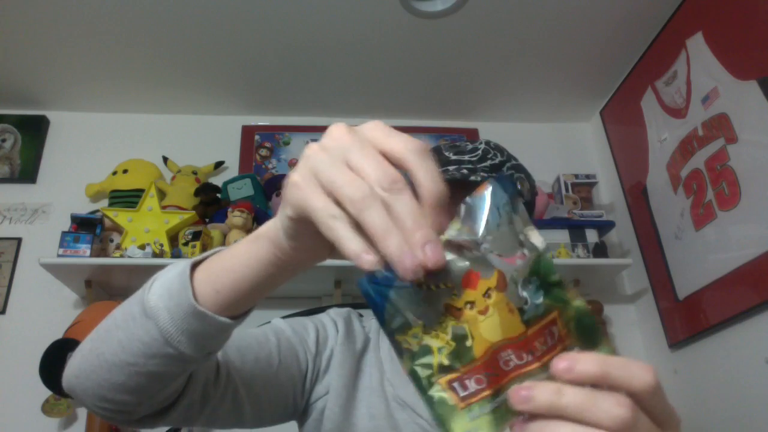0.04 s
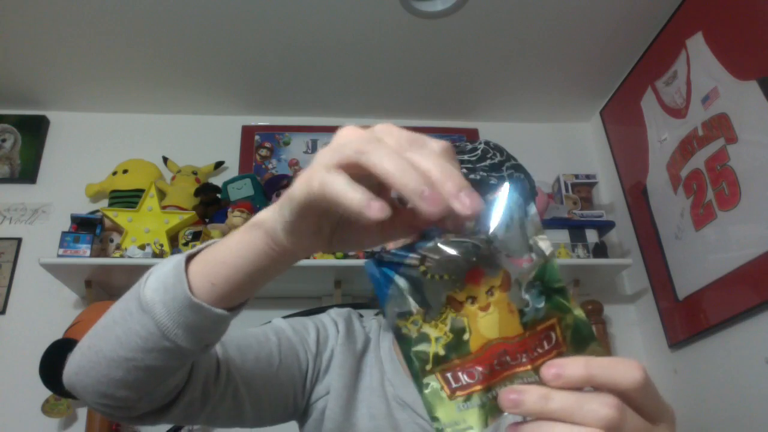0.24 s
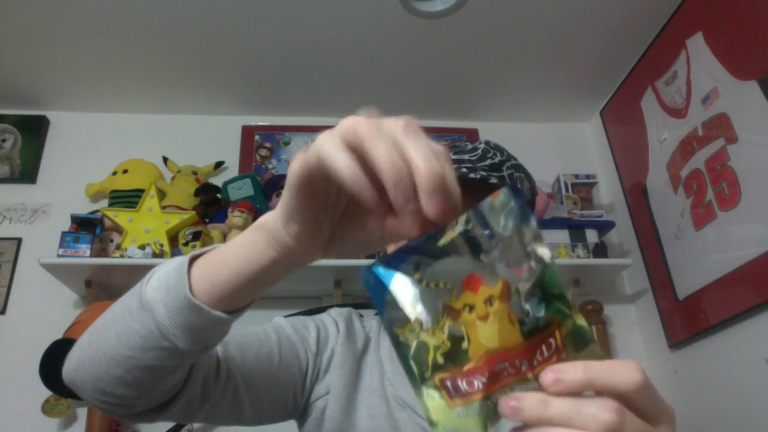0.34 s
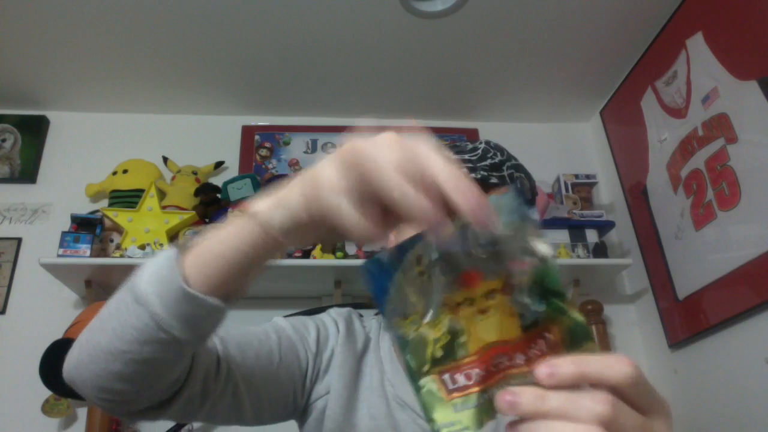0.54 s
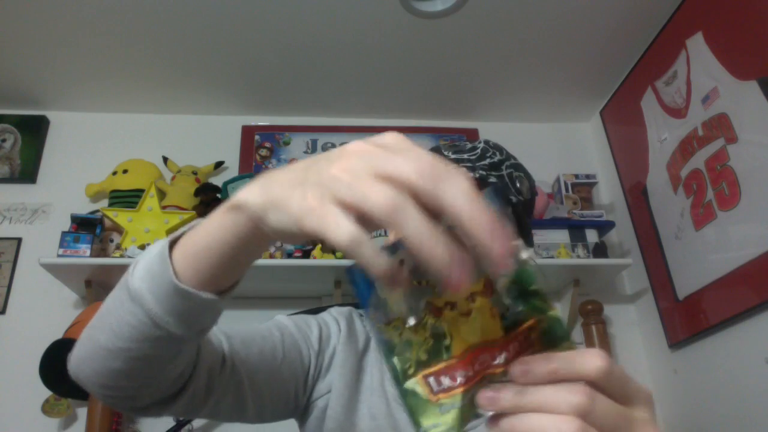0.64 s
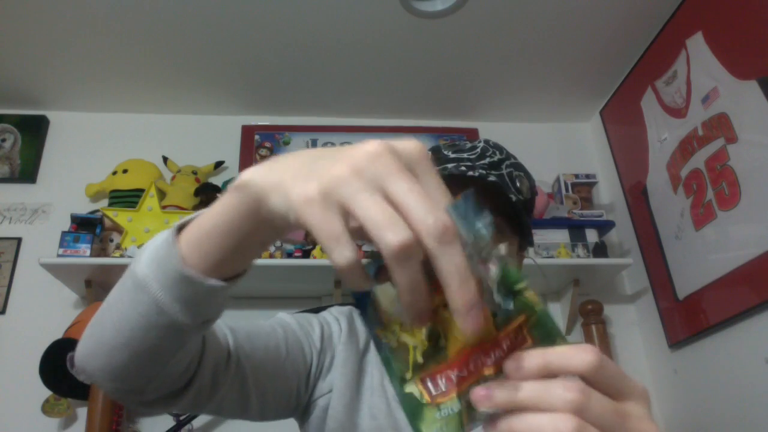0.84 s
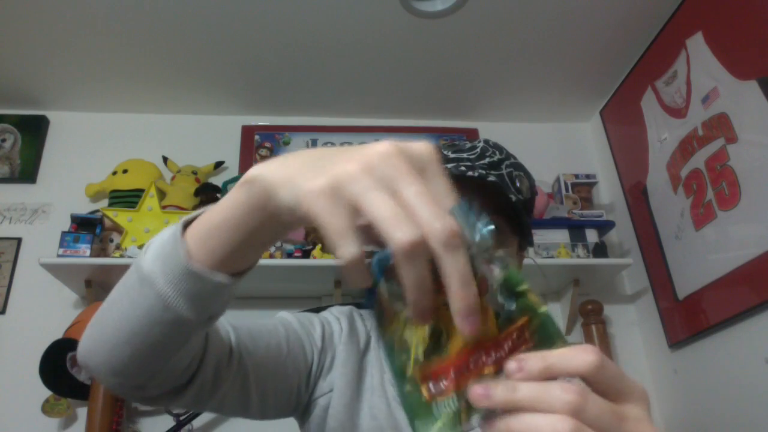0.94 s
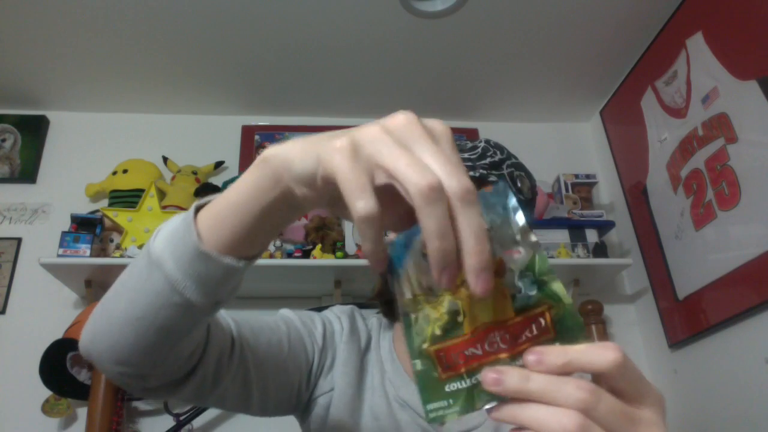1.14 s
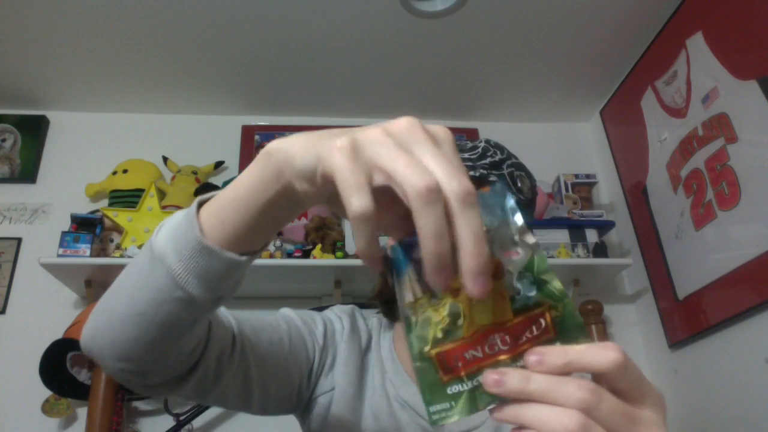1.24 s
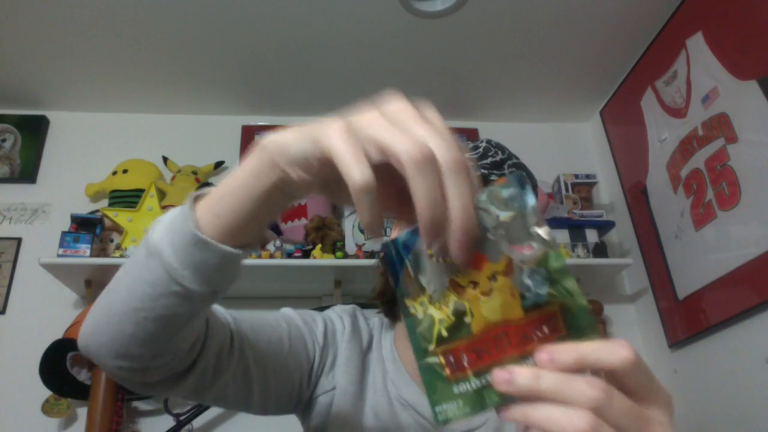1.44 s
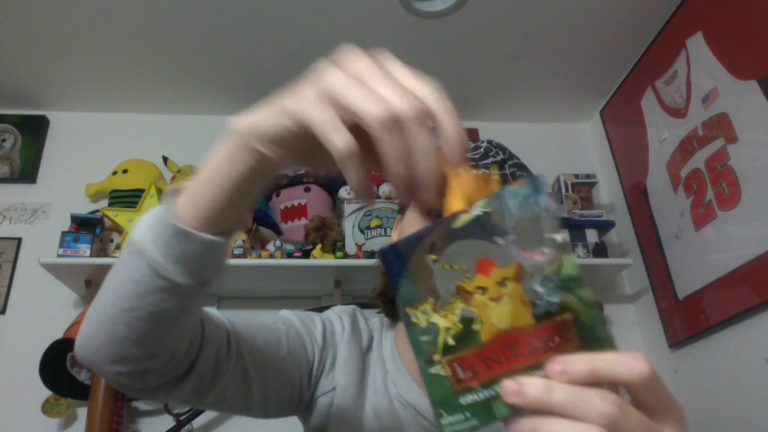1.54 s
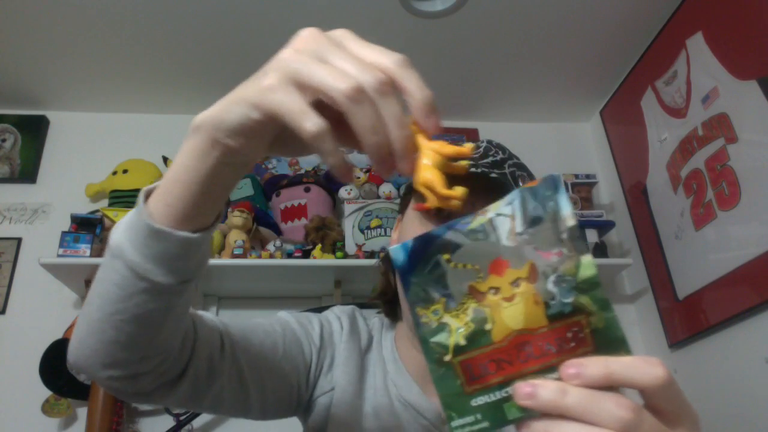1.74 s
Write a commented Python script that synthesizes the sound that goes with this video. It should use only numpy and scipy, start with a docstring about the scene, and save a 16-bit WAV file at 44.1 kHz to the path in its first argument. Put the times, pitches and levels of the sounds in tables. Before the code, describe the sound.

A foil packet crinkles up close as a hand rummages inside. Light ticks lead to a sharp snap at 0.2 seconds. Dense crackling and finger hiss follow from about 0.4 to 1 second, loudest around 0.6. Sparser snaps continue, with a soft bump at 1.1. The hand swishes out faintly near 1.4, and a last cluster of crackles around 1.5 dies away into a small, quiet room.

```python
"""Sharp snaps and fine crinkling of foil, close up: a hand rummages in a torn-open packet for a small toy.
Creases buckle, each ringing a patch of foil for a millisecond or two; a few leave taut foil buzzing, and the
pouch rings briefly as the toy pops free. Between snaps tiny creases tick, sliding fingers hiss and bump the
pouch, and the hand swishes out. A small, quiet room answers."""
import sys
import numpy as np
from scipy import signal
from scipy.fft import rfft, irfft
from scipy.io import wavfile
from scipy.ndimage import uniform_filter1d

SR = 44100
rng = np.random.default_rng(int(sys.argv[2]) if len(sys.argv) > 2 else 0)


def int16_out(signal):
    """Quantize to a 16-bit WAV file."""
    q = np.round(np.clip(np.atleast_2d(signal).T, -1, 1) * 32767)
    wavfile.write(sys.argv[1], SR, q.astype(np.int16))


N = 79380
SIZE = 4096  # samples per short event
BIN_HZ = np.fft.rfftfreq(SIZE, 1 / SR)


def amp(db):
    """Decibels to gain."""
    return 10 ** (np.asarray(db) / 20)


def unit(x):
    """Scale to rms 1."""
    return x / np.sqrt(np.mean(abs(x) ** 2) + 1e-20)


def read(points, hz):
    """Interpolate a table over log frequency."""
    point_hz, value = np.transpose(points)
    return np.interp(np.log(hz + 1), np.log(point_hz), value)


def add(mix, start_s, sound):
    """Mix a sound in at start_s."""
    part = mix[max(round(start_s * SR), 0):][:len(sound)]
    part += sound[:len(part)]


def coloured(x, spectrum):
    """Filter N samples by a spectrum table; rms 1."""
    return unit(irfft(rfft(x) * amp(read(spectrum, np.fft.rfftfreq(N, 1 / SR))), N))


def minimum_phase(gain):
    """Spectrum with this gain and the most abrupt onset."""
    cepstrum = irfft(np.log(np.maximum(gain, 1e-6 * gain.max())))
    cepstrum[1:SIZE // 2] *= 2
    cepstrum[SIZE // 2 + 1:] = 0
    return np.exp(rfft(cepstrum))


def foil_patch(hz, q, slope=1.69):
    """Gain curve of a foil patch's broad resonance."""
    ratio = (BIN_HZ + 1) / hz
    return unit((1 + (q * (ratio - 1 / ratio)) ** 2) ** (-slope / 2))


def grains(per_s, spread_db=3.5):
    """Random tiny clicks of uneven size."""
    size = amp(spread_db * np.minimum(rng.exponential(1, N), 4)) * rng.choice([-1, 1], N)
    return size * (rng.random(N) < per_s / SR)


def handling(ticks_per_s=2200, hiss_grains_per_s=2300):
    """Tiny creases crinkle, skin hisses over foil, the pouch rustles low."""
    # envelopes: (time [s], crinkle [dB], hiss [dB], rustle [dB])
    envelopes = [(0, -47.5, -66, -61), (0.121, -53.5, -65, -65), (.16, -70, -84, -80),
                 (0.212, -46, -54, -62), (.31, -60, -70, -60), (.365, -50, -64, -61),
                 (0.389, -40, -44, -52), (.425, -41, -52, -56), (.46, -27.5, -53, -41),
                 (.49, -47.5, -52, -63), (.56, -44, -57, -52), (.59, -29, -38, -58), (.63, -41, -43, -54),
                 (0.659, -23, -29, -43.5), (0.721, -40, -51, -48), (.745, -32, -38, -48),
                 (.79, -35, -42.5, -58), (0.822, -29.5, -46, -72), (0.891, -44.5, -55, -56),
                 (.94, -46.5, -58, -56), (1.0, -40, -57, -55), (1.089, -51, -52, -57),
                 (1.118, -32.5, -58, -48), (1.16, -46.5, -50.5, -72), (1.21, -51.5, -84, -74.5),
                 (1.259, -55.5, -66, -62), (1.325, -44.5, -53.5, -55), (1.358, -44.5, -47.5, -56),
                 (1.421, -43.5, -55, -55), (1.445, -27, -48.5, -37), (1.475, -41, -52, -42.5),
                 (1.512, -37, -50, -40), (1.582, -71.5, -57, -65.5), (1.64, -69.5, -83, -64.5),
                 (1.8, -76.5, -79.5, -80)]
    # spectra: (frequency [Hz], relative density [dB])
    crinkle_spectrum = [(100, -30), (300, -9), (600, -3.5), (1300, -1), (2300, 0), (3800, -3.5),
                        (5200, -16), (8000, -19), (16000, -39.5)]
    hiss_spectrum = [(1500, -27), (4000, -0.5), (7200, 0), (8300, -1.5), (9500, 9), (12000, -0.5),
                     (14000, -9.5), (16000, -15)]
    rustle_spectrum = [(25, -25.5), (55, -31), (90, -8), (150, 2), (280, 0.5), (500, 4.5), (1200, -20),
                       (5000, -56.5)]
    times_s, *levels_db = np.transpose(envelopes)
    t = np.arange(N) / SR
    crinkle_gain, hiss_gain, rustle_gain = [amp(np.interp(t, times_s, db)) for db in levels_db]
    ticks, patches_hz = np.zeros(N), np.geomspace(500, 9000, num=12)
    for hz in patches_hz:
        tick = irfft(minimum_phase(foil_patch(hz, q=1))) * np.sqrt(hz)
        ticks += signal.oaconvolve(grains(ticks_per_s / len(patches_hz)), tick)[:N]
    # grains plus smooth friction noise
    crinkle = coloured(unit(ticks) + 0.36 * rng.standard_normal(N), crinkle_spectrum)
    hiss = coloured(unit(grains(hiss_grains_per_s)) + 0.7 * rng.standard_normal(N), hiss_spectrum)
    rustle = coloured(rng.standard_normal(N), rustle_spectrum)
    return crinkle_gain * crinkle + hiss_gain * hiss + rustle_gain * rustle


def snap(ring_ms, hz, q, ring_db, push_db, crack_db, top_hz, chatter_share=0.82):
    """A crease flips and chatters briefly: the patch rings, pushes air and cracks."""
    # spectra: (frequency [Hz], relative density [dB])
    push_spectrum = [(30, -50), (70, -32.5), (130, -13), (300, -1.5), (480, -3), (750, -0.5), (1100, -3),
                     (2500, -36.5), (16000, -70.5)]
    crack_spectrum = [(500, -44), (3000, 3), (5200, -6.5), (6100, -3), (7200, 0), (8300, -5), (9200, 2.5),
                      (11500, 0), (14000, 0), (16000, -8.5)]
    t_ms = np.arange(SIZE) / SR * 1000
    chatter = unit(rng.standard_normal(SIZE) * (t_ms / ring_ms) ** 0.7 * np.exp(-2.3 * t_ms / ring_ms))
    flip = unit(signal.unit_impulse(SIZE))
    drive = rfft(chatter_share * chatter + (1 - chatter_share) * flip)
    drive_trend = np.sqrt(uniform_filter1d(abs(drive) ** 2, size=90))
    lowpass = 1 / np.sqrt(1 + (BIN_HZ / top_hz) ** 10)
    ring = amp(ring_db + 0.5) * unit(foil_patch(hz, q) * lowpass)
    push = amp(push_db + 1) * unit(amp(read(push_spectrum, BIN_HZ)))
    crack = amp(crack_db - 1) * unit(amp(read(crack_spectrum, BIN_HZ)) * lowpass)
    gain = np.sqrt(ring ** 2 + push ** 2 + crack ** 2)
    return irfft(drive * minimum_phase(gain / drive_trend)) * np.sqrt(SR / 1000)


def pouch(x, rattle_db=-11.5, rise_s=0.001, decay_s=0.0085):
    """A snap rattles round the packet and bounces off hands and nearby surfaces."""
    # near reflections: (delay [s], gain [ratio])
    echoes = [(.0023, -0.015), (.0036, -0.086), (.0062, 0.067), (.0078, -0.03), (0.0107, 0.0091)]
    t = np.arange(SIZE) / SR
    rattle = rng.standard_normal(SIZE) * np.minimum(t / rise_s, 1) * np.exp(-t / decay_s)
    response = amp(rattle_db) * unit(rattle) / np.sqrt(SIZE)
    response[0] = 1  # direct path
    for delay_s, gain in echoes:
        add(response, delay_s, gain * np.array([1, 2, 1]) / 4)
    return signal.oaconvolve(x, response)[:N]


def snaps():
    """The loud creases buckle, each at its own place on the packet."""
    # (time [s], ring length [ms], patch pitch [Hz], Q, ring, air push, crack [relative dB], cutoff [Hz])
    creases = [(0.0285, 2.2, 2050, 1.6, -20.5, -33.5, -59, 8060),
               (0.0807, 0.1, 2130, 1.3, -19.5, -35, -38, 6200),
               (0.0826, 0.57, 2550, 1.2, -25, -32, -37, 11600),
               (0.224, 0.78, 774, 0.6, -10, -16, -12, 16200),
               (0.2261, 1.1, 2620, 1.22, -4.5, -14, -3, 14700),
               (0.2284, 2.26, 1644, 3.1, -7.5, -13.5, -16, 11400),
               (0.284, 1.8, 625, 1.6, -37, -30.5, -46, 13100), (0.319, 1.5, 700, 1.7, -37, -53, -52, 9800),
               (0.3404, 0.73, 1850, 1.2, -28, -37.5, -50, 6600),
               (0.347, 0.58, 2090, 0.78, -30, -46, -39, 11700),
               (0.3547, 0.85, 2580, 2, -22, -34, -35, 10100),
               (0.3744, 1.76, 2350, 2, -15, -27.5, -10, 12700),
               (0.391, 3, 2650, 1.3, -19, -16.5, -35, 14200),
               (0.393, 0.6, 1310, 0.9, -19.5, -20, -33, 14200),
               (0.404, 1.9, 1980, 2.1, -25, -30.5, -43, 12100),
               (0.4365, 1.7, 2200, 1.8, -14.5, -30, -14.5, 12700),
               (0.4495, 2.8, 1710, 1.2, -12, -24.5, -22, 13100),
               (0.462, 1.9, 1560, 1.5, -17, -28, -32, 11300),
               (0.4954, 1.9, 1520, 1.3, -26.5, -45, -50, 12000),
               (0.517, 0.92, 1530, 1.02, -15.5, -39, -22.5, 10000),
               (0.5306, 1.2, 1470, 0.65, -24, -50, -27, 10300),
               (0.5662, 0.8, 1760, 1.7, -24.5, -52, -49, 10700),
               (0.5748, 1.73, 1630, 0.9, -2, -18, -6.5, 14900),
               (0.5822, 1.7, 1160, 0.7, -30, -15, -16, 8700),
               (0.6041, 0.88, 2400, 1.6, -21, -27, -26, 12200),
               (0.619, 0.78, 1750, 1.5, -15.5, -30, -37, 11800),
               (0.6373, 1.26, 2140, 2.5, -4, -19.5, -4, 14400),
               (0.6544, 2.9, 2070, 1.5, -10, -18.5, -22, 11900),
               (0.6621, 1.4, 2290, 3.4, -24, -37, -27, 11700),
               (0.6924, 0.5, 2050, 1.86, -6, -22.5, -26, 15100),
               (0.6941, 2, 2560, 0.88, -14.5, -25.5, -24, 12100),
               (0.7348, 5.3, 2000, 1.5, -25, -25.5, -22.5, 12400),
               (0.7452, 1.3, 2380, 1.2, -26, -34, -29, 14100),
               (0.7556, 0.55, 1440, 0.59, -15, -27, -19.5, 11700),
               (0.7775, 0.43, 1960, 0.59, -16.5, -41, -22, 10700),
               (0.7802, 3.9, 1970, 1, -36, -40, -41, 13200), (0.8045, 0.6, 2310, 1.4, -17, -30, -23, 11300),
               (0.8123, 1.9, 1800, 1.26, -9, -19, -18, 14100),
               (0.8175, 0.77, 1570, 2.1, -10.5, -33, -28, 10400),
               (0.8377, 0.63, 1040, 1.47, -10.5, -37, -39, 11100),
               (0.8422, 0.86, 1370, 0.96, -11, -41, -12, 13100),
               (0.8487, 2.2, 2420, 1.1, -19, -44, -37, 11500),
               (0.9116, 1.1, 1390, 1.04, -20, -42, -45, 10600),
               (0.9255, 0.61, 1600, 1.5, -20.5, -33.5, -50, 10600),
               (0.9462, 0.66, 2230, 1.3, -16.5, -35, -36, 13000),
               (0.9476, 2, 1840, 0.76, -7.5, -29, -15, 16000),
               (0.977, 1.3, 1310, 0.89, -21.5, -47, -18, 10100),
               (1.0498, 0.35, 1690, 2, -14.5, -31.5, -18.5, 10600),
               (1.1038, 0.78, 1460, 0.97, -20.5, -50, -46, 10800),
               (1.1051, 1.94, 1900, 0.98, -13, -22, -28, 13900),
               (1.1221, 2.1, 2100, 2.9, -17.5, -20.5, -19.5, 10000),
               (1.1674, 0.8, 3130, 2.6, -13.5, -27.5, -31, 16000),
               (1.1704, 2.6, 1730, 1.8, -22, -32.5, -39, 10200),
               (1.1955, 1.3, 1090, 0.81, -18.5, -37, -41, 6500),
               (1.2356, 1.5, 1790, 2.4, -40, -38.5, -67, 12500),
               (1.3117, 2.6, 1950, 3.8, -17, -27.5, -20, 8800),
               (1.3195, 1.7, 1550, 2.9, -20, -25, -20, 7300),
               (1.3868, 1.5, 2050, 1.4, -35, -40.5, -35, 16000),
               (1.4099, 1.3, 910, 1.0, -28, -51, -46, 16000),
               (1.4361, 0.67, 1740, 0.62, -23, -24, -43, 13000),
               (1.4382, 1.1, 2960, 2.6, -18.5, -26, -37, 13700),
               (1.4466, 2.1, 1870, 1.02, -11.5, -18.5, -25, 12100),
               (1.4881, 2.3, 1820, 0.76, -25, -25, -44, 16000),
               (1.4934, 0.66, 1100, 0.67, -17.5, -32, -17, 12100),
               (1.511, 1.04, 820, 1.7, -31, -28, -34, 13400),
               (1.5204, 1.73, 2220, 1.33, -6.5, -21, -13, 12500),
               (1.5951, 0.97, 2070, 3.5, -44, -55, -27, 11100),
               (1.6078, 2.1, 1470, 0.9, -25.5, -51, -55, 9000),
               (1.654, 1.7, 1390, 0.7, -49.5, -55, -55, 12000),
               (1.7278, 1.86, 1020, 0.49, -35, -49, -63.5, 8200)]
    out = np.zeros(N)
    for start_s, *crease in creases:
        add(out, start_s, pouch(snap(*crease)))
    return out


def bumps(rise_s=0.00087, sag=0.27, highpass_hz=110):
    """Fingers bump the pouch; the air inside thuds with sagging pitch and no deep bass."""
    # thuds: (time [s], level [dB], mid-glide pitch [Hz], decay [s])
    thuds = [(.072, -30, 254, 0.002), (.226, -19, 251, 0.0071), (.391, -19, 291, 0.0031),
             (0.436, -29.5, 190, 0.0046), (0.579, -24.5, 236, 0.0079), (0.651, -44, 250, 0.0042),
             (.722, -26.5, 280, .004), (1.109, -24, 324, 0.0058), (1.121, -11.5, 280, 0.0034),
             (1.385, -30, 240, 0.0057), (1.446, -22.5, 167, 0.0043), (1.52, -28, 265, 0.0018)]
    out, t = np.zeros(N), np.arange(SIZE) / SR
    for start_s, db, hz, decay_s in thuds:
        fade = np.exp(-t / decay_s)
        cycles = np.cumsum(hz * (1 - sag + 2 * sag * fade)) / SR
        add(out, start_s, amp(db) * (1 - np.exp(-t / rise_s)) * fade * np.sin(2 * np.pi * cycles))
    return signal.sosfilt(signal.butter(2, highpass_hz, "high", fs=SR, output="sos"), out)


def noise_band(centre_hz, width_hz):
    """Noise band whose centre may move; rms 1."""
    offset_hz = np.fft.rfftfreq(N, 1 / SR)
    bell = np.exp(-(2 * offset_hz / width_hz) ** 2 / 2)
    in_phase, quadrature = irfft(rfft(rng.standard_normal((2, N))) * bell, N)
    phase = 2 * np.pi * np.cumsum(centre_hz * np.ones(N)) / SR
    return unit(in_phase * np.cos(phase) + quadrature * np.sin(phase))


def rings():
    """Foil buzzes on briefly after some snaps, in a narrow band; the last, longer ring is the pouch ringing as
    the toy pops free."""
    # ringing foil: (time [s], level [dB], pitch [Hz], decay [s])
    ringing = [(.517, -22, 1333, .004), (.576, -25, 1280, .006), (.638, -17, 3564, .004),
               (1.521, -32.5, 2640, 0.023)]
    out, t = np.zeros(N), np.arange(N) / SR
    for start_s, db, hz, decay_s in ringing:
        add(out, start_s, amp(db) * np.exp(-t / decay_s) * noise_band(hz, width_hz=660))
    return out


def swish():
    """The hand slides out: skin on foil, brighter as it speeds up."""
    # slide: (time [s], level [dB], band centre [Hz])
    slide = [(1.27, -80, 9870), (1.32, -54, 10450), (1.361, -46, 11500), (1.394, -45, 12700),
             (1.44, -51, 13670), (1.47, -61, 12300), (1.53, -83.5, 11100)]
    times_s, db, hz = np.transpose(slide)
    t = np.arange(N) / SR
    envelope = amp(np.interp(t, times_s, db)) * (t > times_s[0]) * (t < times_s[-1])
    return envelope * noise_band(np.interp(t, times_s, hz), width_hz=5400)


def room(x, wet_db=-16.5, delay_s=0.005, tails=3, crossfade_hz=5):
    """Short diffuse tails, each band dying at its own rate, crossfade as the packet moves."""
    # reverberation time: (frequency [Hz], T60 [s])
    t60 = [(150, 0.17), (600, 0.18), (2500, 0.24), (8000, 0.12), (16000, 0.11)]
    # tail colour: (frequency [Hz], relative level [dB])
    colour = [(150, 1), (600, 1.5), (2500, -5.5), (6000, 6.5), (11000, 2), (16000, 4.5)]
    out, t = np.zeros(N), np.arange(N) / SR
    for k in range(tails):
        hz, age_s, bands = signal.stft(rng.standard_normal(SR // 2), SR, nperseg=256)
        bands *= amp(read(colour, hz)[:, None] - 60 * age_s / read(t60, hz)[:, None])
        tail = signal.istft(bands, SR, nperseg=256)[1]
        weight = np.cos(2 * np.pi * (t * crossfade_hz + k / tails)) * np.sqrt(2 / tails)
        add(out, delay_s, signal.fftconvolve(x * weight, tail / np.linalg.norm(tail)))
    return amp(wet_db) * out


def still_air(level_db=-60.5):
    """Faint steady noise of the room's air."""
    # noise floor: (frequency [Hz], relative density [dB])
    spectrum = [(25, -20), (120, 7), (400, -3), (2000, -2), (4000, -20), (6000, -20.5), (16000, -30.5)]
    return amp(level_db) * coloured(rng.standard_normal(N), spectrum)


def scene():
    """Packet, room and still air; mono."""
    packet = snaps() + rings() + bumps() + handling() + swish()
    return (packet + room(packet) + still_air())[None]


def record(dry):
    """Microphone overload clips the loudest peaks; then bass cut and band limit."""
    ceiling, highpass_hz, lowpass_hz = 0.92, 60, 16200
    bass_cut = signal.butter(2, highpass_hz, "high", fs=SR, output="sos")
    band_limit = signal.firwin(255, lowpass_hz, window=("kaiser", 8), fs=SR)
    clipped = np.clip(dry, -ceiling, ceiling)
    return signal.oaconvolve(signal.sosfilt(bass_cut, clipped), band_limit[None], "same")


dry = scene()
out = record(dry)
int16_out(out)
```